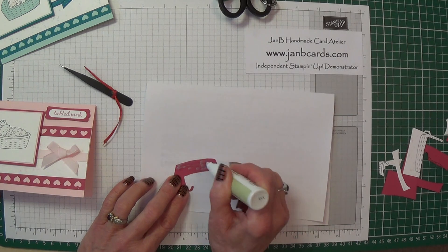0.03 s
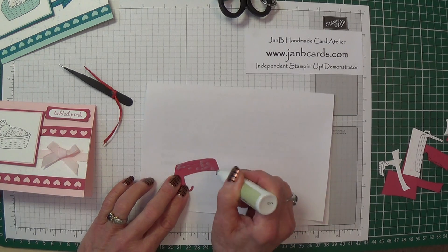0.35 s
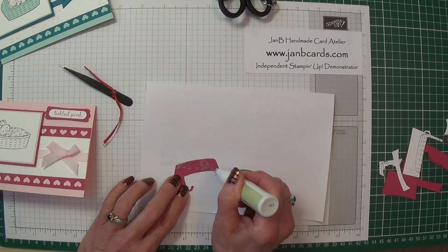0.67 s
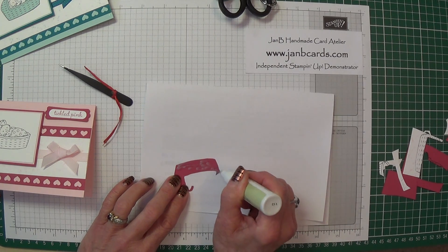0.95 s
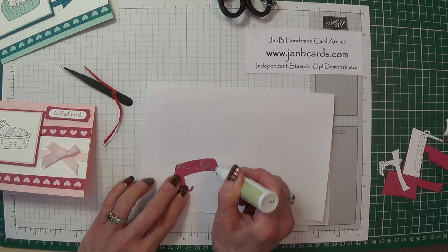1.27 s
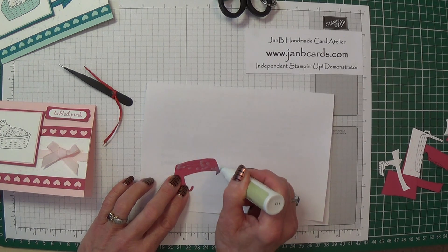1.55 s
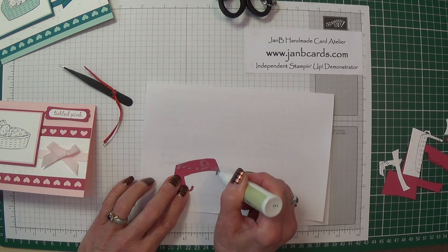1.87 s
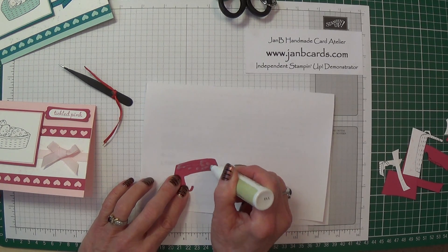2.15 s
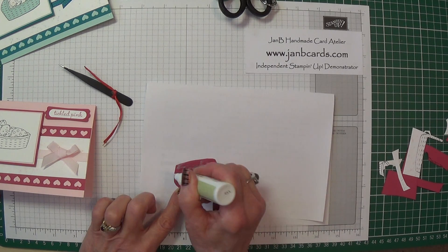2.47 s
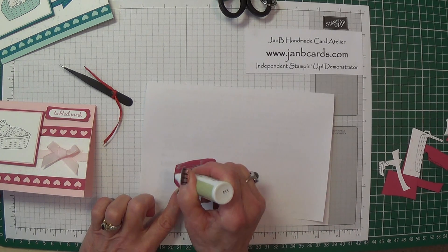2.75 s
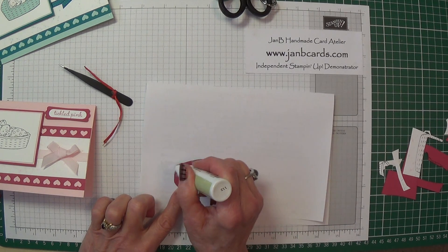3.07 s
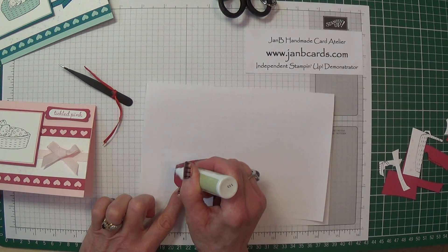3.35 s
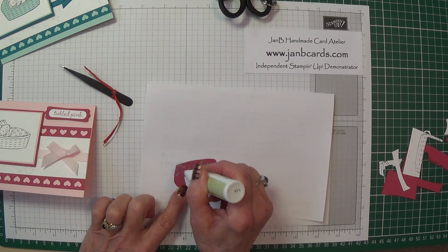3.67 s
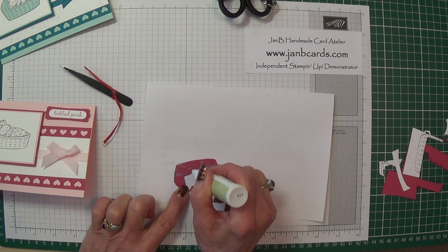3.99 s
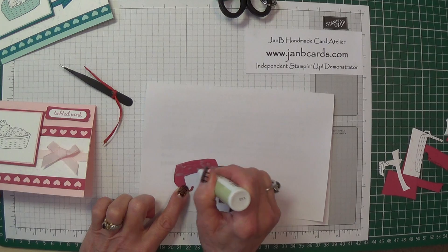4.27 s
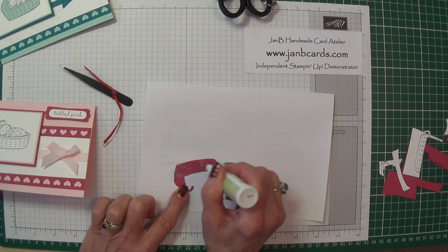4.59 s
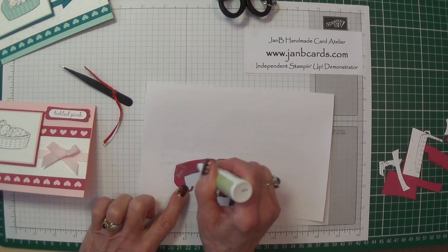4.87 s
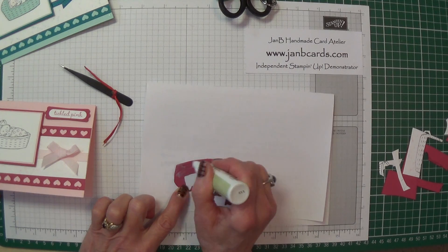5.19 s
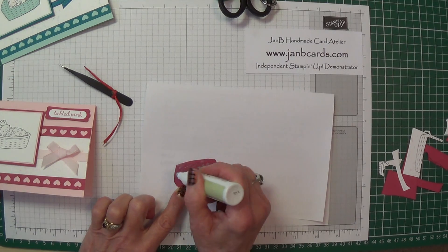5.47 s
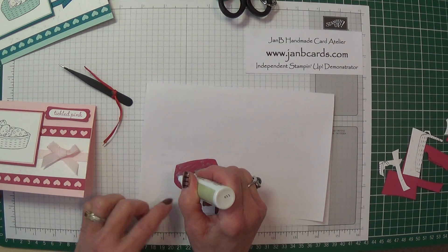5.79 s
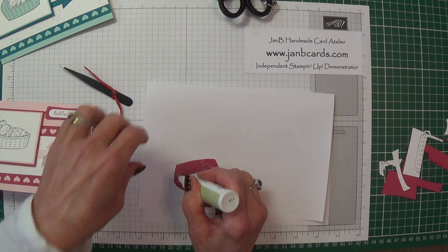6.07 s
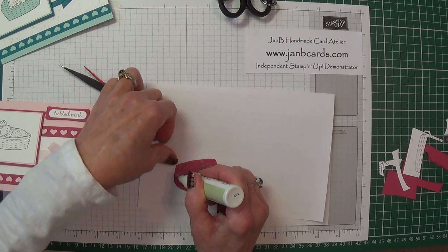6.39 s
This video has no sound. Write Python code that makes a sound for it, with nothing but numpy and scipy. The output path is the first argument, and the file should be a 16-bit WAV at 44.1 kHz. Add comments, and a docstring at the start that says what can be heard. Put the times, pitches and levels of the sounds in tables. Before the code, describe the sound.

A glue pen dabs a small piece of card on a table in quick, light taps, each with a tick, a soft thud and a short scratch. It then rubs to and fro with tiny sticky snaps and rasps, and returns to separate dabs. Near the end, fingers knock softly and a sleeve brushes the paper. It all sounds close, in a small room with faint hum and hiss.

```python
"""Glue pen on card

A glue pen is dabbed and rubbed over a small card on a table. Each impact ticks and excites the
table's low modes; friction on the paper fibres then drives the card's resonances, with rasps where
the tip sticks and slips and snaps where it bounces or a glue thread breaks. Fingers knock and
slide, and near the end a sleeve brushes the paper. Mains hum, a thin whine and hiss lie beneath."""
import sys
import numpy as np
from scipy import signal
from scipy.fft import rfft, irfft
from scipy.io import wavfile
from scipy.ndimage import uniform_filter1d

SR = 44100
rng = np.random.default_rng(int(sys.argv[2]) if len(sys.argv) > 2 else 0)


def int16_out(signal):
    """Quantize to a 16-bit WAV file."""
    q = np.round(np.clip(np.atleast_2d(signal).T, -1, 1) * 32767)
    wavfile.write(sys.argv[1], SR, q.astype(np.int16))


N = 292824

# Levels and gains are relative: each source's function scales and filters them further.
# Mains harmonics: harmonic_number, level_db
HUM_HARMONICS = [(2, -65.5), (3, -75), (4, -68.5), (6, -71)]
# Spectrum of the background hiss: frequency_hz, gain_db
HISS_SPECTRUM = [(20, -0.5), (45, -5.5), (75, -3.5), (130, -2.5), (250, -4.5), (380, -4.5), (1000, -6.5),
                 (2000, -9), (2600, -9), (4000, -12), (10000, -14.5), (15500, -17)]
# Left-right likeness of the hiss: frequency_hz, coherence
HISS_COHERENCE = [(60, 1), (180, 0.91), (330, 0.44), (550, 0.081), (1100, 0), (2200, 0.13), (5000, 0.63),
                  (9000, 0.95), (13000, 1)]
# The pen lands, rests an instant and is dragged:
# touch_s, tick_db, thud_db, rest_s, rise_s, fall_s, scrape_db, bright_db, ring_hz
DABS = [(0.103, -36, -46.5, .036, 0.057, 0.038, -42, 4, 3870),
        (.343, -37.5, -47.5, 0.023, 0.021, .06, -43, -2.5, 6550),
        (.561, -39, -50, 0.023, 0.038, 0.03, -46.5, 1.5, 3700),
        (.748, -46, -74, 0.026, 0.049, 0.022, -51, -5, 3130),
        (0.954, -40, -61, 0.02, 0.041, 0.041, -45, 2, 2230),
        (1.148, -41, -56, 0.019, 0.041, 0.024, -48, -4, 2900),
        (1.328, -41, -59, 0.043, 0.049, 0.0073, -52.5, 0, 5200),
        (1.52, -40, -59, 0.026, 0.042, .022, -50, -1.5, 2540),
        (2.21, -44, -57, 0.02, 0.026, 0.01, -54, -6, 2800),
        (2.551, -42, -48, 0.021, 0.048, 0.043, -42, 7.5, 5560),
        (2.787, -46, -53, 0.018, 0.031, 0.05, -41.5, 8, 3260),
        (4.521, -28, -48, .027, 0.036, 0.1, -39, 4.5, 4580),
        (4.822, -31, -48, 0.028, 0.024, 0.11, -43.5, -3, 9100),
        (5.096, -35, -45, 0.024, 0.027, 0.09, -43.5, -0.5, 4900),
        (5.331, -39, -51.5, 0.017, 0.044, 0.04, -47.5, -2.5, 2630),
        (5.563, -35.5, -46, .022, .034, .027, -67, -15, 3500)]
# Crackles of the tacky tip and flicks of the paper: start_s, level_db, bright_db
SNAGS = [(.779, -35.5, -5), (1.419, -34.5, -2), (2.811, -38, 12), (3.134, -34, 5), (3.162, -33, 3),
         (4.16, -27.5, -11), (5.467, -43.5, -34), (5.733, -34.5, 3.5), (6.165, -42, -22)]
# The card's response to a click: frequency_hz, gain_db
CLICK_SPECTRUM = [(300, -28), (1500, -5.5), (3500, 0), (6500, -6.5), (9300, 5), (12000, 0), (15500, -16)]
# Modes of the table: pitch_hz, level_db, t60_s
TABLE_MODES = [(40, -11.5, 0.28), (94, 2.5, 0.072), (143.2, -3, 0.19), (239, -4, 0.13), (331, -2.5, 0.1)]
# Bounces of the tip and breaking glue threads: start_s, level_db, bright_db
SNAPS = [(.1138, -40, -10), (.5714, -35.5, -6), (0.6234, -31, -13), (0.967, -39, -8), (2.0947, -37.5, 6),
         (2.2501, -33.5, -3), (2.255, -33.5, 13), (2.7889, -38.5, 3), (2.908, -36.5, -6), (2.814, -28, 8),
         (3.0056, -34, -13), (3.5167, -30, -5), (4.521, -33.5, -10), (5.3316, -35, -1), (5.7315, -37, 10),
         (6.2225, -34, -3)]
# Knocks of fingers and sleeve: start_s, level_db, pitch_hz, t60_s
KNOCKS = [(.114, -39.5, 920, 0.0047), (0.3525, -41.5, 1400, .016), (0.3638, -43, 1120, .013),
          (6.104, -42.5, 1000, 0.01), (6.1565, -40, 920, 0.0068), (6.202, -42, 900, .011),
          (6.309, -42, 900, 0.0064)]
# The card's response to rubbing at three places: frequency_hz, gain_db
CARD_RIGHT_END = [(400, -20), (800, -24.5), (1400, -13), (1900, -18), (2400, -3.5), (3300, -2), (3900, 1),
                  (4800, -11), (5200, -3), (5700, -7), (6500, -6), (7300, -15), (8300, -10), (9700, 0),
                  (11100, -13), (11900, -11), (15500, -25)]
CARD_LEFT_END = [(400, -35), (1900, -10.5), (2550, -1), (3400, -1), (3850, -3), (4300, 0.5), (5300, -0.5),
                 (6000, -5.5), (7300, -5), (8100, -5), (8800, .5), (10200, -1.5), (11100, -8), (12000, -7),
                 (13400, -15), (15500, -22)]
CARD_LOWER_EDGE = [(400, -20.5), (800, -19), (2050, -10.5), (2500, -1.5), (3100, -3), (4600, .5),
                   (5300, -.5), (6400, -8), (7900, -3), (8600, 0), (9700, 1.5), (11000, -8.5),
                   (11900, -4.5), (13200, -13.5), (15500, -24)]
# The tip rubs to and fro without lifting: crest_s, length_s, level_db, bright_db, ring_hz
SCRUBS = [(1.732, .04, -55.5, 9, 3620), (1.896, 0.037, -58.5, -7, 3800), (2.438, 0.065, -52, 9, 8900),
          (2.489, 0.1, -58, 6, 4400), (2.91, 0.049, -57.5, -1, 2800), (2.968, 0.038, -48, 4.5, 2800),
          (3.053, 0.091, -47.5, -6, 4850), (3.135, .04, -48.5, 2, 2780), (3.226, 0.086, -48, -1.5, 4800),
          (3.332, .085, -49.5, 2.5, 3000), (3.417, 0.068, -50, -4, 4440), (3.519, 0.066, -51, -2, 3020),
          (3.6, 0.092, -49.5, -6, 4950), (3.707, 0.081, -48.5, 1.5, 4200), (3.752, 0.092, -43.5, 8, 4500),
          (3.84, 0.11, -38.5, 8.5, 9500), (3.978, 0.15, -43, 0.5, 8240), (4.114, 0.076, -45.5, 5, 3900),
          (4.152, 0.087, -44, -1.5, 12200), (4.303, 0.17, -40.5, 1.5, 4480), (4.71, .026, -51.5, 7, 4000)]
# Cloth and skin slide on the table: start_s, rise_s, fall_s, level_db, first_hz, last_hz
SLIDES = [(.141, 0.0053, .058, -53, 1410, 1100), (0.349, 0.0099, 0.12, -57, 1200, 540),
          (2.72, 0.24, .61, -65, 705, 1520), (5.95, 0.32, 0.16, -60.5, 420, 740)]
# The tip grabs and lets go: release_s, build_s, level_db, ring_hz
RASPS = [(.214, 0.011, -47, 10200), (0.395, 0.038, -43.5, 9500), (1.016, 0.027, -43, 3680),
         (3.056, 0.047, -42, 4900), (3.826, 0.025, -40, 9800), (4.343, 0.023, -37, 8700),
         (4.617, 0.031, -38.5, 8600), (4.887, 0.012, -41.5, 8800)]
# The tip creeps between scrubs: start_s, length_s, level_db
CREEPS = [(2.862, 0.36, -60), (3.233, .45, -62), (3.858, .1, -61.5)]
# The sleeve brushes the paper: crest_s, length_s, level_db, ring_hz
SLEEVE_BRUSHES = [(6.241, 0.059, -54.5, 10000), (6.347, 0.097, -54.5, 10600)]

PLACE_CHANGES_S = [2.0, 3.9]  # the pen moves to the next part of the card
DAB_ATTACK, SCRUB_ATTACK = 0.61, 2.6  # amplitude as a power of speed: a dab bites, a scrub swells


def amp(db):
    """Amplitude ratio of a level in decibels."""
    return 10 ** (np.asarray(db) / 20)


def unit(x):
    """Normalisation to an rms of 1."""
    return x / np.sqrt(np.mean(x ** 2) + 1e-20)


def curve(points, hz):
    """Linear interpolation on a log-frequency axis."""
    f, value = np.transpose(points)
    return np.interp(np.log(hz + 1), np.log(f + 1), value)


def add(mix, start_s, sound):
    """Superposition: a sound adds to the mix from start_s on."""
    part = mix[max(round(start_s * SR), 0):][:len(sound)]
    part += sound[:len(part)]


def decay(t, t60_s):
    """Exponential damping, by 60 dB in t60_s."""
    return np.exp(-np.log(1000) * t / t60_s)


def impulse_response(gain_db_at, size=1024):
    """Minimum phase: a magnitude spectrum determines a causal response, here of unit energy."""
    log_gain = np.log(amp(gain_db_at(abs(np.fft.fftfreq(size, 1 / SR)))))
    response = np.fft.ifft(np.exp(np.conj(signal.hilbert(log_gain)))).real[:size // 2]
    return response / np.linalg.norm(response)


def wander(cutoff_hz):
    """Low-passed noise: a random drift of rms 1."""
    f = np.fft.rfftfreq(N, 1 / SR)
    return unit(irfft(rfft(rng.standard_normal(N)) / (1 + (f / cutoff_hz) ** 4), N))


def hum_and_whine(mains_hz=50, whine_hz=15625, whine_db=-65.5, gap_share=0.35):
    """A harmonic series on the mains frequency, and an electronic whine gated once a mains cycle."""
    t = np.arange(N) / SR
    mains = sum(amp(db) * np.cos(2 * np.pi * round(k) * mains_hz * t) for k, db in HUM_HARMONICS)
    gate = uniform_filter1d(1. * (t * mains_hz % 1 > gap_share), size=160)
    return np.sqrt(2) * mains + amp(whine_db) * unit(gate * np.sin(2 * np.pi * whine_hz * t))


def hiss(level_db=-59.5):
    """Partially coherent noise: the two channels are alike in the bass and the high treble."""
    f = np.fft.rfftfreq(N, 1 / SR)
    mid, side = rfft(rng.standard_normal((2, N))) * amp(curve(HISS_SPECTRUM, f))
    coherence = np.clip(curve(HISS_COHERENCE, f), -1, 1)
    mid, side = mid * np.sqrt(1 + coherence), side * np.sqrt(1 - coherence)
    return amp(level_db) * unit(irfft(np.array([mid + side, mid - side]), N))


def click_response(bright_db):
    """Impulse response of the card to a click, with a treble shelf."""
    shelf = [(4500, 0), (9000, bright_db)]
    return impulse_response(lambda f: curve(CLICK_SPECTRUM, f) + curve(shelf, f))


def ticks(gain_db=-12.5, t60_s=0.042, touch_bright_db=-6.5):
    """Transient excitation: at each touch or snag, a crackle of glue and fibres rings the card."""
    out, t = np.zeros(N), np.arange(SR // 16) / SR
    events = [(touch, db, touch_bright_db) for touch, db, *_ in DABS] + SNAGS
    for start, db, bright_db in events:
        crackle = rng.standard_normal(len(t)) * decay(t, t60_s)
        add(out, start, amp(db + gain_db) * signal.fftconvolve(crackle, click_response(bright_db)))
    return out


def thuds(gain_db=-2, press_s=0.0019, lag_s=0.00458):
    """Modal vibration: the soft tip excites the table's low modes, in new phases at each spot."""
    out, t = np.zeros(N), np.arange(SR // 4) / SR
    onset = 1 - np.exp(-t / press_s)
    for touch, _, db, *_ in DABS:
        phases = rng.random(len(TABLE_MODES))
        ring = sum(amp(mode_db) * decay(t, t60) * np.sin(2 * np.pi * (hz * t + phase))
                   for (hz, mode_db, t60), phase in zip(TABLE_MODES, phases))
        add(out, touch + lag_s, amp(db + gain_db) * onset * ring)
    return out


def snaps(crackle_db=-19, t60_s=0.013):
    """Impulse excitation: one sharp click drives the card, followed by a tiny crackle of fibres."""
    out, t = np.zeros(N), np.arange(SR // 20) / SR
    for start, db, bright_db in SNAPS:
        body = click_response(bright_db)
        force = (t == 0) + amp(crackle_db) * rng.standard_normal(len(t)) * decay(t, t60_s)
        add(out, start, amp(db) * signal.fftconvolve(force, body / abs(body).max()))
    return out


def knocks(gain_db=3, rise_s=0.00035):
    """Heavily damped oscillation: a knock of finger or sleeve lasts only a few cycles."""
    out, t = np.zeros(N), np.arange(SR // 20) / SR
    onset = 1 - np.exp(-(t / rise_s) ** 2)
    for start, db, hz, t60 in KNOCKS:
        add(out, start, -amp(db + gain_db) * onset * decay(t, t60) * np.sin(2 * np.pi * hz * t))
    return out


def fibre_friction(snags_per_s=5000, spread_db=3.5, grip_db=0.76, grip_hz=180):
    """Friction noise: smooth rubbing plus snapping fibres, modulated by a grip that sticks and slips."""
    sizes = amp(spread_db * np.minimum(rng.exponential(1, N), 3.5)) * rng.choice([-1, 1], N)
    impulses = unit(sizes * (rng.random(N) < snags_per_s / SR))
    return unit((impulses + rng.standard_normal(N)) * amp(grip_db * wander(grip_hz)))


def shifting_resonances(x, depth_db=1.5):
    """Random spectral modulation: narrow resonances of the card come and go as the tip travels."""
    spectrogram = signal.stft(x)[2]
    patches = rng.standard_normal(spectrogram.shape)
    for _ in range(2):
        patches = uniform_filter1d(uniform_filter1d(patches, size=9, axis=1), size=3, axis=0)
    return unit(signal.istft(spectrogram * amp(depth_db * unit(patches)))[1][:N])


def swell(rise_s, fall_s, attack, release):
    """Power law of rubbing: returns the hand's speed (0-1) and the amplitude that follows it."""
    t = np.arange(int((rise_s + fall_s) * SR)) / SR
    speed = np.sin(np.pi / 2 * np.interp(t, [0, rise_s, rise_s + fall_s], [0, 1, 0]))
    return speed, speed ** np.where(t < rise_s, attack, release)


def stroke(friction, start_s, rise_s, fall_s, db, bright_db, ring_hz, drag_db, attack,
           ring_db=4.0, ring_width_hz=320, crossover_hz=5500, speed_power=0.84):
    """Forced vibration: friction rings the card, dark as it digs in and bright as it flicks off."""
    place = np.searchsorted(PLACE_CHANGES_S, start_s + rise_s)
    card, flick_db = [(CARD_RIGHT_END, 10), (CARD_LEFT_END, 3), (CARD_LOWER_EDGE, 3)][place]
    low_shelf, high_shelf = [(1500, drag_db), (2500, 0)], [(4000, 0), (12000, bright_db)]
    body = impulse_response(lambda f: curve(card, f) + curve(low_shelf, f) + curve(high_shelf, f)
                            + ring_db * np.exp(-((f - ring_hz) / ring_width_hz) ** 2))
    speed, envelope = swell(rise_s, fall_s, attack, release=0.8)
    n = len(speed)
    lift = amp(flick_db * np.linspace(-.5, .5, n))  # less pressure: more treble, less body
    scratch = signal.fftconvolve(friction[int(start_s * SR):][:n], body)[:n]
    lows = signal.filtfilt(*signal.butter(2, crossover_hz, fs=SR), scratch)
    highs = scratch - lows
    return amp(db) * envelope * (lows / np.sqrt(lift) + highs * lift * speed ** speed_power)


def pen_strokes(rise_share=0.59, firm_db=-34, firm_drag_db=-2, drag_slope=0.6458):
    """Sliding friction of the tip: a scrape after each landing, and scrubs to and fro."""
    out, friction = np.zeros(N), shifting_resonances(fibre_friction())
    moves = [(touch + rest, *scrape, DAB_ATTACK) for touch, _, _, rest, *scrape in DABS]
    for crest, length, *scrape in SCRUBS:
        rise = rise_share * length
        moves.append((crest - rise, rise, length - rise, *scrape, SCRUB_ATTACK))
    for start, rise, fall, db, bright_db, ring_hz, attack in moves:
        drag_db = firm_drag_db + drag_slope * (firm_db - db)  # lighter strokes keep more low drag
        add(out, start, stroke(friction, start, rise, fall, db, bright_db, ring_hz, drag_db, attack))
    return out


def slides(width_hz=750, slips_per_s=88, slip_size=0.67, gain_db=-2):
    """Soft friction of cloth and skin, with nearly regular slips, drives a broad, gliding resonance."""
    slip_count = np.floor(np.cumsum(slips_per_s * amp(2 * wander(20))) / SR)
    slips = np.diff(slip_count, prepend=0)
    rub = (rng.standard_normal(N) + slip_size * unit(slips)) * amp(2 * wander(26))
    out, pole = np.zeros(N), np.exp(-np.pi * width_hz / SR)
    for start, rise, fall, db, first_hz, last_hz in SLIDES:
        envelope = swell(rise, fall, attack=0.91, release=0.6)[1][:N - int(start * SR)]
        glide_hz = np.linspace(first_hz, last_hz, len(envelope))
        carrier = np.exp(2j * np.pi * np.cumsum(glide_hz) / SR)
        # shifting down, low-passing and shifting back makes a moving band-pass
        baseband = rub[int(start * SR):][:len(carrier)] / carrier
        band = (carrier * signal.lfilter([1], [1, -2 * pole, pole * pole], baseband)).real
        add(out, start, amp(db + gain_db) * envelope * unit(band))
    return out


def rasps(build_power=1.7, let_go_s=0.008, width_hz=550, focus_db=12):
    """Stick-slip: the tip grabs, judders ever harder on one resonance of the card, then lets go."""
    out, judder = np.zeros(N), fibre_friction(spread_db=2.5, grip_db=1.8, grip_hz=300)
    for release, build, db, hz in RASPS:
        body = impulse_response(lambda f: curve(CARD_LOWER_EDGE, f)
                                + focus_db * np.exp(-((f - hz) / width_hz) ** 2))
        _, envelope = swell(build, let_go_s, build_power, release=1)
        start, n = release - build, len(envelope)
        rasp = signal.fftconvolve(judder[int(start * SR):][:n], body)[:n]
        add(out, start, amp(db) * envelope * unit(rasp))
    return out


def creeps():
    """Shot noise: a slow tip plucks the fibres one by one in a faint, uneven crackle."""
    out, body = np.zeros(N), impulse_response(lambda f: curve(CARD_LEFT_END, f))
    crackle = signal.oaconvolve(fibre_friction(snags_per_s=700, spread_db=2.0, grip_db=2.5), body)
    for start, length, db in CREEPS:
        fade = signal.get_window(("tukey", .5), int(length * SR))
        add(out, start, amp(db) * fade * crackle[int(start * SR):][:len(fade)])
    return out


def sleeve(bright_db=5, drag_db=15):
    """Sliding friction of cloth on paper, softer and broader in spectrum than the pen's."""
    out, friction = np.zeros(N), fibre_friction()
    for crest, length, db, ring_hz in SLEEVE_BRUSHES:
        half = length / 2
        brush = stroke(friction, crest - half, half, half, db, bright_db, ring_hz, drag_db, SCRUB_ATTACK)
        add(out, crest - half, brush)
    return out


def reflections(x, t60_s=0.18, echoes_per_s=3000, first_echo_s=0.003,
                spectrum_hz_db=((100, -20), (1000, -8), (3000, -15), (9000, -19), (15000, -28))):
    """Reverberation of a small furnished room: sparse decaying echoes, different in each channel."""
    t = np.arange(SR // 3) / SR
    echoes = rng.standard_normal((2, len(t))) * (rng.random((2, len(t))) < echoes_per_s / SR)
    echoes *= (t > first_echo_s) * decay(t, t60_s)
    echoes /= np.linalg.norm(echoes, axis=1, keepdims=True)
    wet = signal.fftconvolve(x[None], echoes, axes=1)[:, :N]
    return irfft(rfft(wet) * amp(curve(spectrum_hz_db, np.fft.rfftfreq(N, 1 / SR))), N)


def scene():
    """Superposition of the centred direct sound, its reflections and the steady background."""
    pen = pen_strokes() + creeps() + rasps() + ticks() + snaps() + thuds()
    direct = pen + knocks() + slides() + sleeve()
    return direct + reflections(direct) + hum_and_whine() + hiss()


def record(dry):
    """Band limiting by a linear-phase low-pass filter."""
    low_pass = signal.firwin(1023, cutoff=15900, window=("kaiser", 9), fs=SR)
    return signal.oaconvolve(dry, low_pass[None], "same", axes=1)


dry = scene()
out = record(dry)
int16_out(out)
```